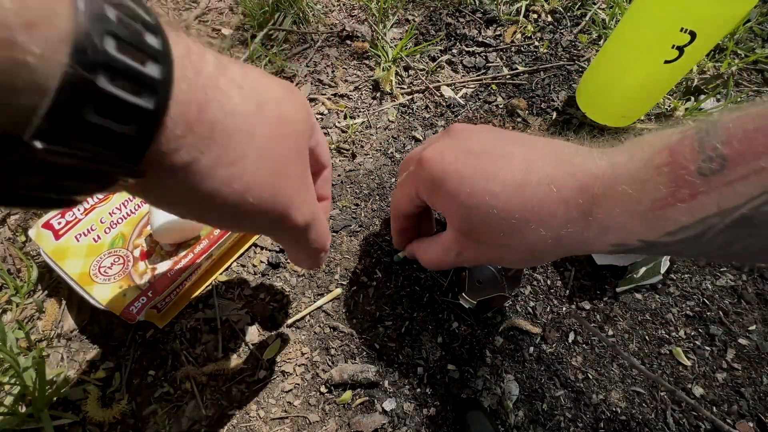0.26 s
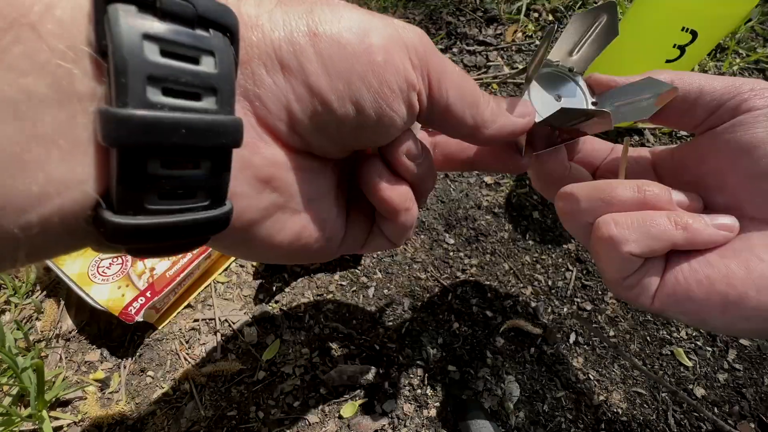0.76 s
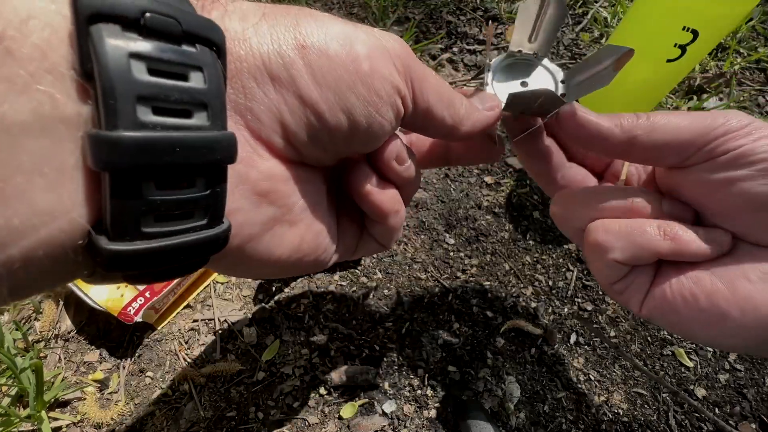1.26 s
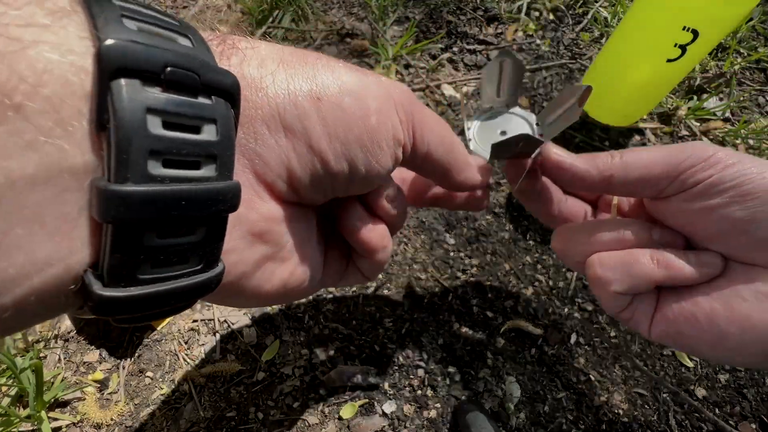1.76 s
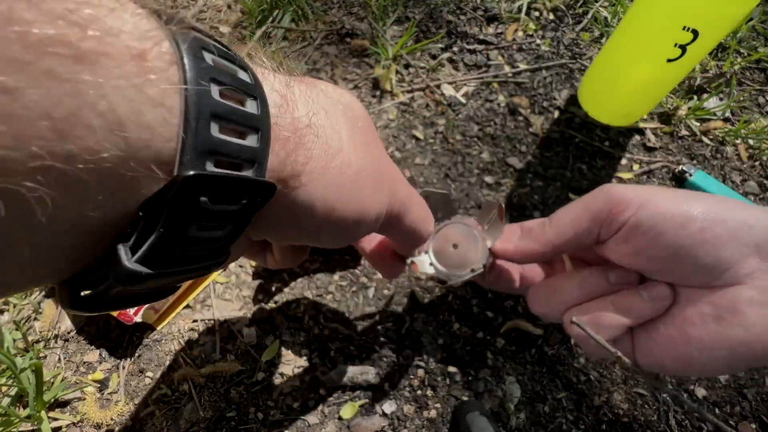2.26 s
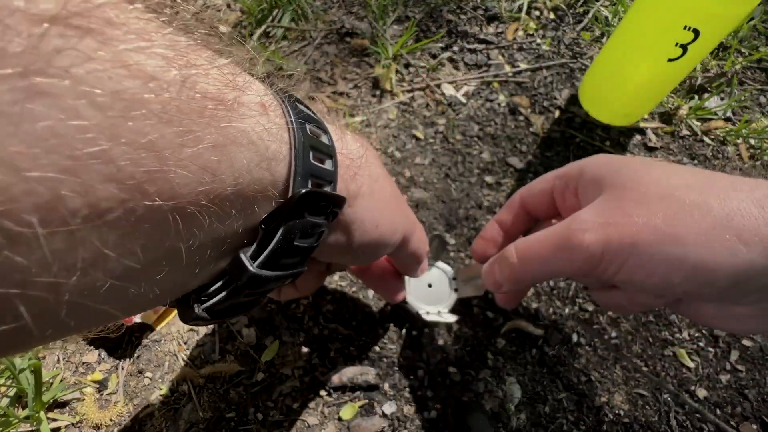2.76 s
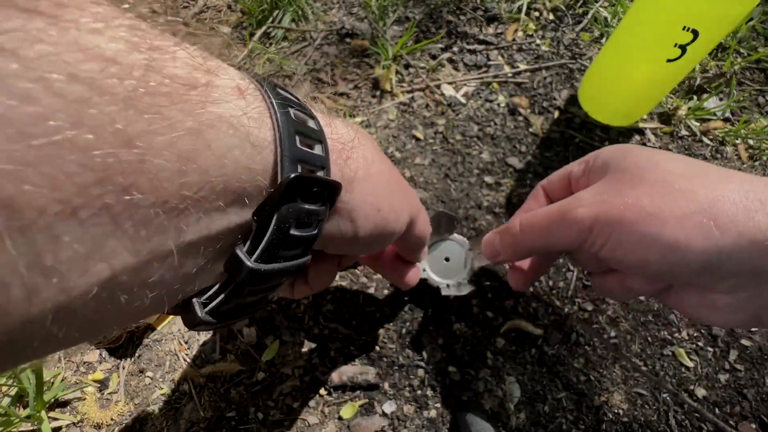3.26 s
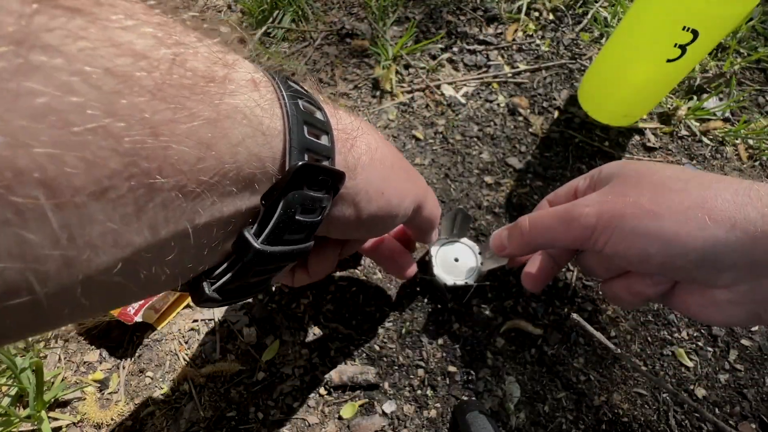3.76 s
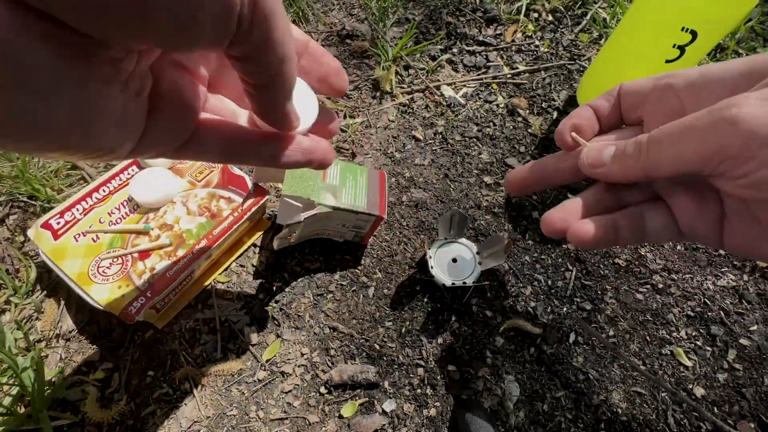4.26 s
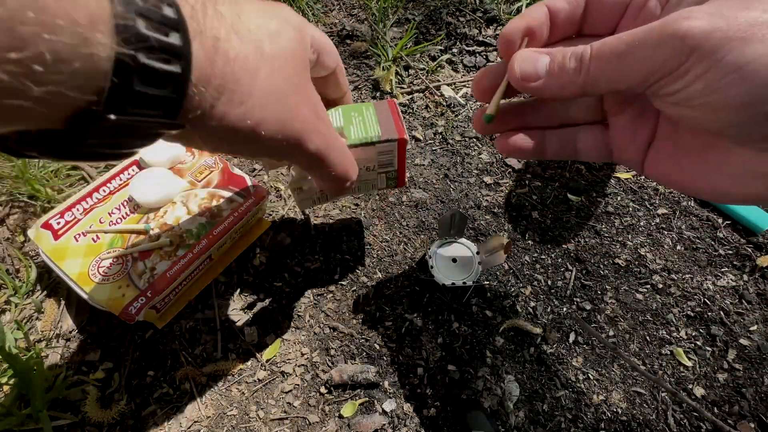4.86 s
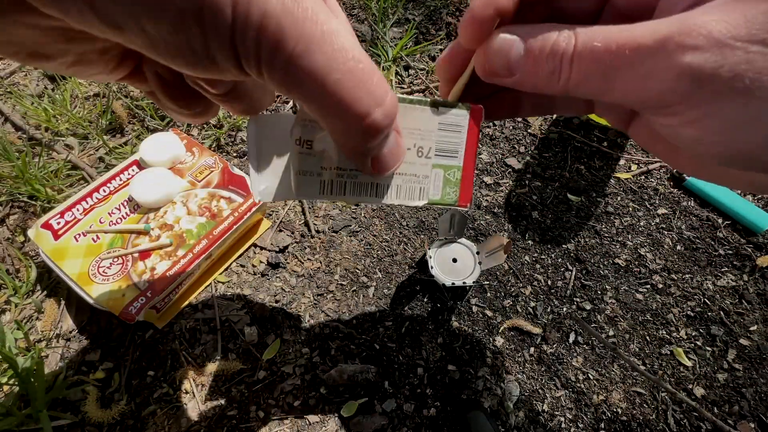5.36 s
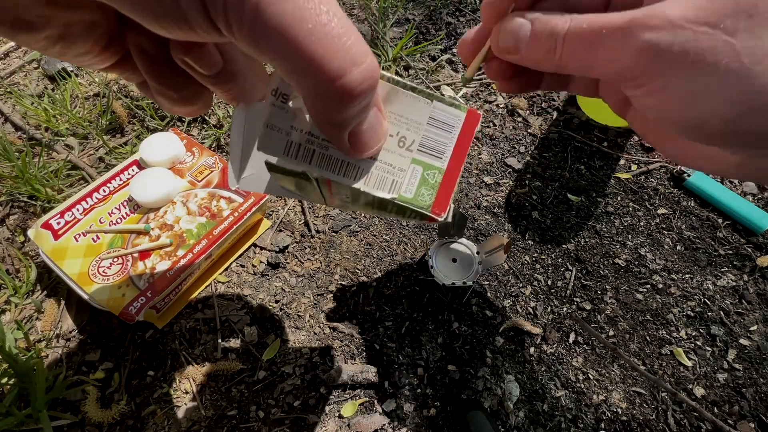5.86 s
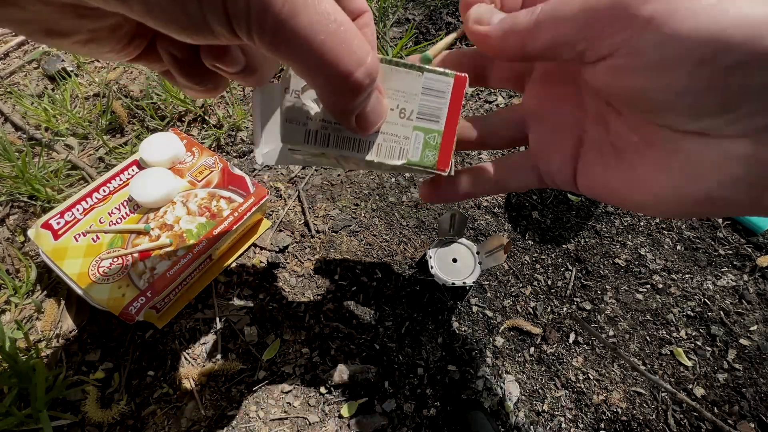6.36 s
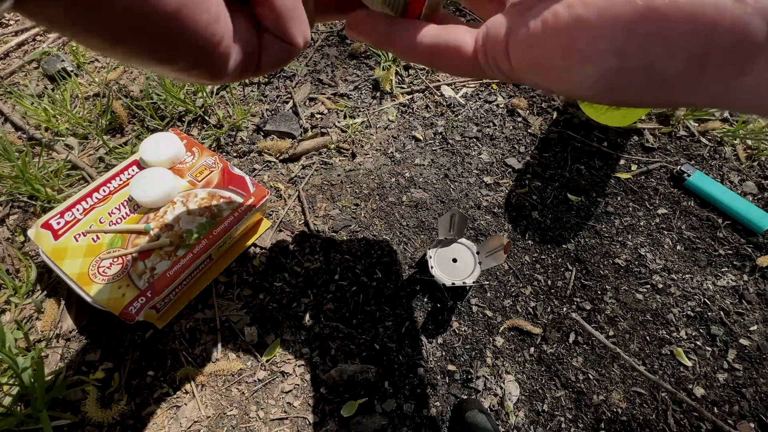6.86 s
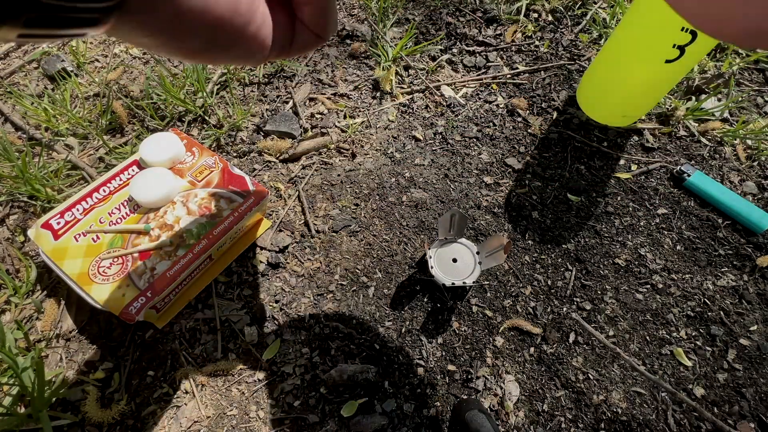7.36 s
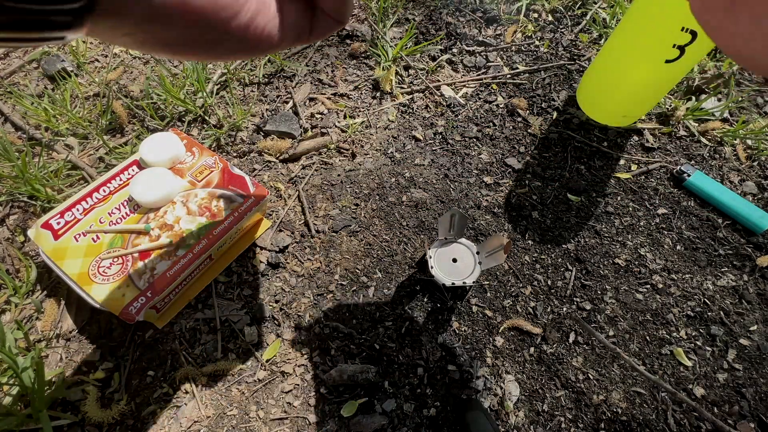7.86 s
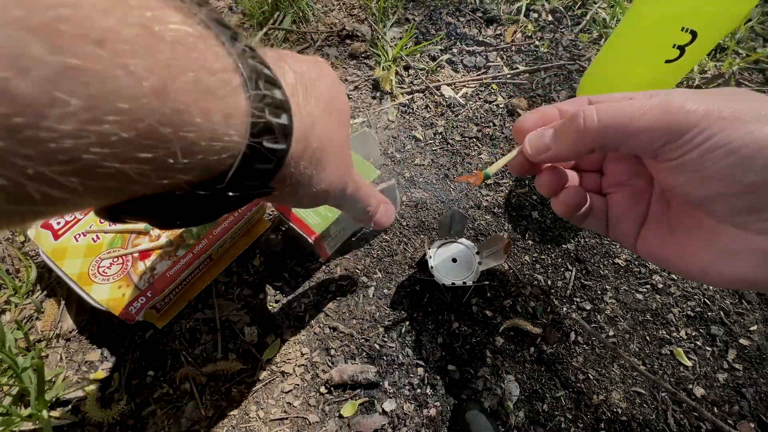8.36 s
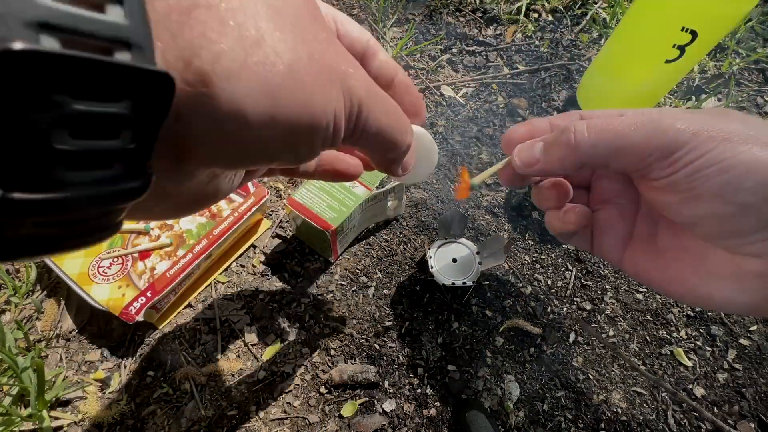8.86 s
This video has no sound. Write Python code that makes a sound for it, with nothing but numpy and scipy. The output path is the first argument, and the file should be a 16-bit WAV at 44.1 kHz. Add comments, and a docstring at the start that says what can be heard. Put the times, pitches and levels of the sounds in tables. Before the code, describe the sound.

Thin bright metal ticks and scratchy hinge slips come first, close to the microphone, with low wind buffets and a far bird whose whistles turn buzzy. A small hollow card box follows, with pops, taps and dry slides of fingers. One short match scrape fails, a second two seconds later ignites, and a hissing, sputtering flame brightens and swells to the end, with a few last box taps. Open air, dry, little echo.

```python
"""Outdoors, close to the microphone, a small folding metal stove clinks: ticks ring its legs and bowl. Stiff
hinges rasp in small slips, and a far bird sings in gliding tones that turn from whistle to buzz. A cardboard
box is then turned in the fingers: taps dent it and ring its modes, slides are streams of slips. A match is
struck on it twice, a tearing of hard grains; the second strike catches and the head flares as crackling noise
over a roar. Rumbling eddies of wind reach the microphone throughout, and buffets of air push on it: gusts, a
jerk of the hand at the first strike, low puffs as the flame sputters."""
import sys
import numpy as np
from scipy import signal
from scipy.fft import rfft, irfft
from scipy.io import wavfile

SR = 44100
rng = np.random.default_rng(int(sys.argv[2]) if len(sys.argv) > 2 else 0)


def materialize(psi):
    """Save the field psi as 16-bit PCM at rate SR to the path in sys.argv[1].

    A 1-D psi becomes a single channel; in a 2-D psi each row is a channel.
    """
    bounded = np.clip(np.atleast_2d(psi).T, -1, 1)
    quanta = np.round(bounded * 32767).astype(np.int16)
    wavfile.write(sys.argv[1], SR, quanta)


N = 401310

# All level_db columns are relative; the functions below set the final levels.

# stove clinks: start_s, peak_db, leg_ring_db, bowl_ring_db, strongest_bowl_hz
CLINKS = [(0.238, -9, -60, -59, 5680), (0.3, -40, -56, -54, 12200), (0.8943, -18, -75, -47.5, 7200),
          (1.029, -18, -64, -33.5, 7100), (1.043, -25, -69, -40.5, 7100), (1.09, -30, -71, -48.5, 9650),
          (1.193, -39, -65, -50, 13300), (1.222, -36, -55, -43.5, 14700), (1.498, -18, -64, -46, 14800),
          (1.776, -17, -44, -39, 14600), (1.8044, -30, -48.5, -42.5, 5710), (1.832, -16, -44, -38, 13800),
          (2.36, -19, -61, -42.5, 12400), (2.468, -4, -21.5, -31.5, 5600), (2.703, -17, -52, -42.5, 12200),
          (2.853, -30, -66, -50, 11700), (2.92, -18, -66, -43.5, 11700), (3.061, -20, -55, -47, 11200),
          (3.139, -28, -55, -35, 13700), (3.157, -29, -50.5, -40, 5530), (3.363, -29, -49, -44, 13300),
          (3.381, -14, -42.5, -28, 13300), (3.395, -21, -51, -34, 14500), (3.409, -4, -49.5, -23.5, 12200)]
# resonances of the stove's legs: pitch_hz, level_db, t60_s
LEG_MODES = [(2913, -1, .46), (2971, 0, .38), (3110, -5, .08), (3260, -4, .06)]
# resonances of the stove's bowl: pitch_hz, level_db, t60_s
BOWL_MODES = [(2400, -20, 0.91), (4640, -11.5, 0.23), (5100, -8.5, 0.098), (5600, 0, 0.092),
              (5690, -9.5, 0.18), (5800, -13, 0.1), (5940, -33, 0.15), (7100, -7.5, 0.26),
              (7130, -10, 0.26), (8100, -3, 0.066), (9000, -10, 0.079), (9000, -4, 0.12), (9650, 2, .07),
              (10540, 7.5, 0.14), (11200, 14.5, 0.049), (11700, 5, .07), (12200, 6.5, 0.14),
              (12420, 11.5, 0.073), (12500, 13, 0.052), (13300, 0, 0.087), (14100, 11, 0.061),
              (14000, -15, .04), (14100, 8, 0.12), (14900, 5, 0.084), (16200, 14, .06)]


def stove():
    """Each touch of thin metal is a scratchy tick that rings legs and bowl; the loose parts chatter after it."""
    s, peak_db, leg_db, bowl_db, main_hz = np.transpose(CLINKS)
    tick_colour = [(500, -39), (2500, -2.0), (5500, 17.5), (9000, 2), (13000, 7), (16000, 4.0)]   # (Hz, dB)
    tick = colour(bursts(s, peak_db - 20.0, t60=0.012, alike=0.059, rise_s=0.00085), tick_colour)

    # the legs ring on only when the stove is set down; otherwise fingers damp them
    free = leg_db == leg_db.max()
    legs = struck(s[free] + 0.0045, leg_db[free], LEG_MODES, vary_db=0, detune=0, skew=0.3)
    held_modes = [(hz, db, 0.52 * t60) for hz, db, t60 in LEG_MODES]
    legs += struck(s[~free], leg_db[~free] + 2.0, held_modes, vary_db=6.5, detune=0.0102, skew=0.54)

    emphasis_db = -7 * np.tanh(4 * octaves_from(main_hz, BOWL_MODES))
    bowl = struck(s, bowl_db + 14.5, BOWL_MODES, vary_db=2.5, detune=0.0055, skew=1.0,
                  emphasis_db=emphasis_db)

    settling = signal.lfilter([1], [1, -np.exp(-1 / (0.01 * SR))], blows(s, bowl_db))   # dies away in 10 ms
    chatter_modes = [(hz, 1.16 * db, 0.35 * t60) for hz, db, t60 in BOWL_MODES]
    chatter = ring(grains(per_s=2100, spread_db=16.5, alike=0.039) * settling, chatter_modes)
    return tick + legs + bowl + from_db(-9.0) * chatter


# hinges scraping, metal sliding in the fingers: start_s, length_s, grit_db, bowl_ring_db
HINGE_SCRAPES = [(.212, 0.029, -44, -53), (.255, 0.054, -57, -56), (.4, 0.022, -76, -50),
                 (.47, 0.023, -77, -49), (.62, 0.024, -72, -47), (.97, 0.073, -71, -48),
                 (1.03, 0.021, -60, -42), (1.225, 0.024, -60, -43), (1.265, 0.044, -59, -48),
                 (1.42, .05, -67, -52), (1.555, 0.018, -72, -58), (1.72, 0.09, -61, -46.5),
                 (1.772, 0.081, -58, -39), (2.27, 0.043, -72, -47), (2.428, 0.038, -49, -39),
                 (2.455, 0.013, -40.5, -38), (2.73, 0.051, -58, -49), (2.86, 0.034, -72, -51),
                 (3.11, .025, -68, -46), (3.14, 0.044, -52, -42), (3.28, 0.095, -55, -46.5),
                 (3.378, 0.0086, -42, -55), (3.62, 0.1, -55.5, -71)]
# spectrum of gritty friction, on hinges and on card: pitch_hz, level_db
GRIT_COLOUR = [(150, -15), (600, -7.5), (1500, 4.5), (2600, 4), (4200, -3), (6000, -3.5), (7600, -34),
               (9000, -6.5), (12500, 5), (16000, -1.5)]


def hinges():
    """Stiff hinges turn in a stream of small slips that rasp and ring the bowl."""
    grit, body = strokes(HINGE_SCRAPES, rise_s=0.017, release_s=0.018)
    slips = grains(per_s=1700, spread_db=1.5, alike=0.056) * from_db(2.0 * drift(77))
    damped_bowl = [(hz, db, 0.17 * t60) for hz, db, t60 in BOWL_MODES]
    return colour(slips * grit, GRIT_COLOUR) + ring(slips * body, damped_bowl)


FIDGET_FROM_S, FIDGET_TO_S = .05, 3.2
FIDGET_DB, FIDGET_RANGE_DB = -40, 10   # strongest tick, and how far below it the others may lie


def fidgets(count=16):
    """Fingers tick faintly on the metal at loose intervals and ring the bowl they damp."""
    spacing_s = (FIDGET_TO_S - FIDGET_FROM_S) / count
    s = FIDGET_FROM_S + spacing_s * (np.arange(count) + rng.random(count))
    levels_db = FIDGET_DB - FIDGET_RANGE_DB * rng.random(count)
    touches = bursts(s, levels_db, t60=0.053, alike=.3, rise_s=.002)
    return ring(touches, [(hz, db, 0.15 * t60) for hz, db, t60 in BOWL_MODES])


DENT_DB, AFTER_RING_DB = -4, -9.0   # the dent and the softer ring after it, against the tap's level
# resonances of the hollow box: pitch_hz, level_db, t60_s
BOX_MODES = [(482, 0, 0.023), (760, -2, 0.019), (990, 3.5, 0.033), (1110, 2.5, 0.031), (1300, 5.5, 0.016),
             (1490, 1, 0.031), (1806, -11.5, 0.073)]
# bright resonances of the card panels: pitch_hz, level_db, t60_s
PANEL_MODES = [(2210, 5, 0.02), (2680, 3.5, 0.045), (3600, -16, 0.025), (4270, 4.5, 0.029),
               (5050, 5, 0.019), (5680, 10.5, 0.02), (6600, 13, 0.0054), (6850, 12, 0.011),
               (8330, 10, 0.017), (9250, 5, 0.011)]


def box():
    """Taps set the hollow cardboard ringing; rubbing drives it with a stream of small slips."""
    s, peak_db, crack_db, main_hz = np.transpose(box_contacts())
    knock = dents(s, peak_db + DENT_DB, main_hz)
    knock += struck(s + 0.001963, peak_db + AFTER_RING_DB, BOX_MODES, vary_db=0.0, detune=0.023, skew=0.95,
                    emphasis_db=favoured(main_hz))
    crack = bursts(s, crack_db + 5.5, t60=0.0076, alike=0.74, rise_s=0.00043)
    rasp, hollow = rubs()
    bright = rasp + from_db(1.5) * colour(crack, GRIT_COLOUR) + from_db(-6.0) * ring(crack, PANEL_MODES)
    bright = ground_echo(bright, delay_ms=0.836, wander_ms=0.198, share=0.55)
    return snaps() + place(knock + hollow + landings() + bright, left_db=5.0, lag_ms=0.18)


# taps and snaps of the box: start_s, peak_db, crack_db, strongest_hz
TAPS = [(4.727, -15, -24, 1470), (4.735, -27, -38, 1450), (4.776, -25, -27, 920), (4.839, -41, -21.5, 880),
        (4.872, -24.5, -20.5, 1530), (5.2778, -14, -22, 1450), (5.298, -31, -31, 1300),
        (5.333, -25, -28, 1130), (5.344, -21.5, -26, 1430), (5.377, -18, -19, 1700),
        (5.391, -42, -28, 1400), (5.473, -15, -11, 1080), (5.484, -19.5, -18, 1230),
        (5.531, -24, -19, 1110), (5.705, -22, -40, 1260), (5.717, -6.5, -8, 1085), (5.736, -11, -37, 1110),
        (5.747, -11, -18, 1280), (5.798, -34.5, -30, 960), (5.859, -41, -35, 1220),
        (5.871, -21.5, -30, 1250), (6.2064, -14, -25.5, 1280), (6.233, -21, -25.5, 1120),
        (6.297, -40, -39.5, 1300), (6.38, -35, -23, 1180), (6.4556, -11, -22, 1500),
        (6.5702, -7.5, -19, 1260), (6.639, -22.5, -28.5, 1110), (6.7605, -6, -18.5, 1240),
        (6.792, -16, -32, 1490), (6.814, -29, -31, 990), (6.831, -33, -37, 1100), (6.846, -15.5, -40, 1560),
        (6.912, -33, -29.5, 1490), (6.938, -33, -58, 1110), (7.17, -21.5, -23.5, 1085),
        (7.293, -23.5, -22, 1108), (7.377, -28.5, -50, 1140), (7.4087, -22.5, -32, 1110),
        (7.476, -27, -28, 1040), (7.709, -3.5, -20, 1105), (8.146, -24, -16.5, 1490),
        (8.194, -17.5, -21, 1490), (8.384, -16, -19, 1310), (8.392, -21, -28, 910), (8.427, -22, -34, 1010)]
# fingers and match head sliding on the box: start_s, length_s, swell_s, grit_db, box_ring_db, strongest_hz
RUBS = [(4.67, 0.058, .004, -39.5, -38, 1490), (4.71, 0.027, 0.0041, -35.5, -33, 1300),
        (4.753, .025, 0.0044, -38, -39, 1300), (4.771, 0.064, 0.0016, -40.5, -44, 930),
        (4.836, 0.027, .001, -32.5, -39, 1490), (4.884, 0.052, .002, -47.5, -65, 1080),
        (5.028, 0.047, 0.0027, -51.5, -51, 1490), (5.079, 0.11, 0.0059, -54, -49.5, 1390),
        (5.321, 0.072, 0.0034, -47, -42.5, 1400), (5.463, .012, .004, -39, -40, 1220),
        (5.491, 0.047, 0.0014, -32, -35.5, 1110), (5.74, 0.025, .002, -40, -36.5, 1200),
        (5.792, 0.12, .003, -49.5, -47, 1190), (6.217, 0.018, 0.0062, -37, -36, 1058),
        (6.247, 0.019, .003, -52, -46.5, 1260), (6.363, 0.027, 0.0078, -40, -45, 1180),
        (6.391, 0.19, 0.034, -48, -46, 1300), (6.464, 0.027, .003, -56, -51, 1450),
        (6.531, 0.043, 0.013, -34, -33.5, 1060), (6.579, 0.1, .002, -66, -52.5, 1170),
        (6.748, 0.018, 0.0035, -30, -29, 1090), (6.788, 0.028, 0.0024, -33, -33, 1300),
        (6.824, 0.03, 0.0024, -45, -39.5, 1470), (6.871, 0.012, 0.0057, -39, -35.5, 1480),
        (6.893, 0.019, 0.0056, -62, -46, 1480), (6.95, 0.34, 0.05, -56.5, -52, 1080),
        (7.163, 0.053, 0.0017, -46, -39.5, 1066), (7.258, 0.09, 0.012, -46.5, -46.5, 1104),
        (7.406, 0.0081, .001, -35, -25.5, 1110), (7.42, 0.031, 0.0022, -41.5, -39, 1120),
        (7.466, 0.018, 0.0062, -30.5, -31, 1030), (8.339, 0.035, 0.009, -39, -32, 995),
        (8.401, 0.031, 0.0036, -44, -28, 1318)]
# knock and crack of a catch above the slide's own levels, and the spread of both
CATCH_KNOCK_DB, CATCH_CRACK_DB, CATCH_SPREAD_DB = -5.5, 2, -1


def box_contacts():
    """The firm taps, and a light catch of the card at a random moment of every slide."""
    rows = list(TAPS)
    for s, length, _, grit_db, box_db, _ in RUBS:
        vary_db = CATCH_SPREAD_DB * rng.standard_normal()
        caught_s = s + length * rng.random()
        knock_db, crack_db = box_db + CATCH_KNOCK_DB + vary_db, grit_db + CATCH_CRACK_DB + vary_db
        rows.append((caught_s, knock_db, crack_db, rng.uniform(870, 1300)))
    return rows


def rubs():
    """Each slide feeds small slips and sparse crackles into a box held a little differently: rasp, hollow ring."""
    slips = grains(per_s=4000, spread_db=2.5, alike=0.35) * from_db(2.0 * drift(71))
    slips = rms_one(slips + from_db(-7) * grains(per_s=170, spread_db=3.0, alike=0.8))
    rasp, hollow = np.zeros((2, 2, N))
    for s, length, swell_s, grit_db, box_db, main_hz in RUBS:
        t = np.arange(round((length + .05) * SR)) / SR
        pressure = (1 - np.exp(-t / swell_s)) * np.exp(-np.maximum(t - length, 0) / 0.0069)
        force = slips[:, round(s * SR):][:, :len(t)] * pressure
        body = gripped(BOX_MODES, vary_db=3.0)
        body[np.argmin(np.abs(body[:, 0] - main_hz)), 0] = main_hz   # the nearest mode takes the listed pitch
        body[:, 1] += favoured(np.array([main_hz])).ravel()
        add(hollow, s, from_db(box_db) * ring(force, body))
        add(rasp, s, from_db(grit_db + 1.0) * colour(force, GRIT_COLOUR))
        add(rasp, s, from_db(grit_db - 6.0) * ring(force, gripped(PANEL_MODES, vary_db=5.5)))
    return rasp, hollow


GRIP_SHIFT = 0.047   # spread of the retuning, as a share of the pitch


def gripped(modes, vary_db):
    """The modes of the card as one grip of the fingers retunes them and changes their strengths."""
    hz, db, t60 = np.transpose(modes)
    shift, strength = rng.standard_normal((2, len(hz)))
    return np.transpose([hz * (1 + GRIP_SHIFT * shift), db + vary_db * strength, t60])


FAVOUR_DB = 10.5   # the most that a far mode is held down


def favoured(main_hz):
    """Where the box is touched decides which of its modes speaks: dB for each contact and mode."""
    return -FAVOUR_DB * np.tanh(3.8 * octaves_from(main_hz, BOX_MODES))


DENT_CYCLES = 1.06   # swings until the dent is strongest


def dents(times, peaks_db, pitches_hz):
    """The touched face of the card gives way and swings back: a hollow pop of a few cycles."""
    out, t = np.zeros((2, N)), np.arange(SR // 50) / SR
    for s, db, hz in zip(times, peaks_db, pitches_hz):
        u = t * hz / DENT_CYCLES
        add(out, s, from_db(db) * u * np.exp(1 - u) * np.sin(2 * np.pi * hz * t))
    return out


# the box bumps the ground: start_s, peak_db
LANDINGS = [(4.873, -33), (8.385, -51)]
# resonances of the box on the ground: pitch_hz, level_db, t60_s
BUMP_MODES = [(418, -9, .08), (477, 13, 0.17), (580, -11, 0.059)]


def landings():
    """The box bumps the ground and a few low modes thud."""
    s, peak_db = np.transpose(LANDINGS)
    return struck(s, peak_db, BUMP_MODES, vary_db=1.0, detune=.01, skew=.2)


# thin, very bright snaps of the card's edge: start_s, peak_db
SNAPS = [(6.348, -14), (7.123, -14), (7.632, -33), (8.144, 0)]
# spectrum of a snap: pitch_hz, level_db
SNAP_COLOUR = [(2000, -36), (7000, -16), (9500, 7.5), (12500, 18), (16000, -6)]


def snaps():
    """The card's thin edge snaps: short bursts of very bright noise."""
    s, peak_db = np.transpose(SNAPS)
    return colour(bursts(s, peak_db - 2.0, t60=0.015, alike=0.43, rise_s=0.0018), SNAP_COLOUR)


# fast strikes along the strip: start_s, length_s, grit_db, box_ring_db
STRIKES = [(5.7157, 0.022, -22.5, -25), (7.711, 0.0064, -10.5, -22), (7.7197, 0.0051, -28, -19.5)]
# spectrum of the tearing grains: pitch_hz, level_db
STRIKE_COLOUR = [(30, -10), (90, 2), (200, -6), (600, 3.5), (1500, 7), (3000, 8), (4200, 0.5), (5800, 9.5),
                 (7600, 0), (9000, 5), (11000, 7), (14000, 17), (16000, -16)]
# the whole box bending: pitch_hz, level_db, t60_s
FLEX_MODES = [(146.5, -3, 0.1), (199, 7.5, 0.054), (320, -8, 0.089), (453, -43, 0.037)]
# the head squeaks as it is pressed on, and the stick twangs when it slips: slip_s, pitch_hz, level_db
SQUEAKS = [(5.473, 5530, -26.5), (5.7172, 5680, -17), (7.711, 5210, -17.5), (7.71, 6130, -27)]
SQUEAK_SWELL_S, TWANG_DB, TWANG_S = 0.0059, 18, 0.0024   # time constants; the twang is set against the squeak


def strikes():
    """The match head squeaks, then tears along the strip: dense hard grains also shake and bend the box."""
    grit, body = strokes(STRIKES, rise_s=0.00018, release_s=0.0016)
    tearing = grains(per_s=18000, spread_db=4.0, alike=0.32)
    sound = from_db(6.5) * colour(tearing * grit, STRIKE_COLOUR)
    sound += from_db(-10.5) * ring(tearing * grit, PANEL_MODES)
    sound += from_db(-2.5) * ring(tearing * body, BOX_MODES)
    s, length, _, box_db = np.transpose(STRIKES)
    sound += struck(s + length / 2, box_db - 3.0, FLEX_MODES, vary_db=3.0, detune=0.07, skew=0.38)

    t = np.arange(-SR // 40, SR // 100) / SR   # the slip is at zero
    twang = from_db(TWANG_DB) * np.exp(-np.abs(t) / TWANG_S)
    slip = np.where(t < 0, np.exp(t / SQUEAK_SWELL_S), twang)
    for s, hz, db in SQUEAKS:
        unsteady = np.cumsum(0.17 * rng.standard_normal(len(t)))
        add(sound, s + t[0], from_db(db) * slip * np.sin(2 * np.pi * hz * t + unsteady))
    return place(sound, left_db=7.0, lag_ms=0.1)


IGNITION_S, IGNITION_RISE_S = 7.812, 0.02
# level, how far below it the flare starts, time constant of the growth
FIZZ_DB, FIZZ_GROWTH_DB, FIZZ_GROWTH_S = -31.5, 2.5, 0.28
ROAR_DB, ROAR_GROWTH_DB, ROAR_GROWTH_S = -35, 17, 0.39
DULL_START_DB, BRIGHTENING_S, BRIGHT_FROM_HZ = 12.5, 0.2, 1500   # the treble starts this far down
CRACKLES_PER_S, CRACKLE_DB = 300, -7
SPURT_DB, SPURT_S = -46, 0.45   # the first spurt of gas and its decay
# spectrum of the fizz: pitch_hz, level_db
FIZZ_COLOUR = [(300, -22), (700, 4), (1050, 3), (1500, 5), (2200, 0.5), (2800, -4), (3600, -2.5),
               (4500, -5), (6200, -4.5), (7600, -11.5), (8200, -3.5), (9800, -5.5), (11400, 5), (14000, 5),
               (15500, -2.5)]
# spectrum of the roar: pitch_hz, level_db
ROAR_COLOUR = [(40, -17), (100, -0.5), (180, 1.5), (340, -2.5), (550, -5), (900, -53), (2000, -21.5)]
# spectrum of the hollow first spurt: pitch_hz, level_db
SPURT_COLOUR = [(400, -33), (800, 4), (1080, 10), (1500, -11), (2300, -2), (3500, -22)]


def flare():
    """The head catches with a hollow spurt, then burns as a sputtering, crackling jet over a fluttering roar."""
    age = np.maximum(np.arange(N) / SR - IGNITION_S, 0)
    lit = 1 - np.exp(-age / IGNITION_RISE_S)
    crackle = from_db(CRACKLE_DB) * grains(per_s=CRACKLES_PER_S, spread_db=2.0, alike=0.54)
    jet = grains(per_s=14000, spread_db=-0.2, alike=0.075)
    sputter = patchy(jet + crackle, depth_db=2.4, rate=16)

    fizz_db = FIZZ_DB - FIZZ_GROWTH_DB * np.exp(-age / FIZZ_GROWTH_S) + 1.1 * drift(45)
    fizz = colour(sputter, FIZZ_COLOUR) * from_db(fizz_db)
    dull = signal.lfilter(*signal.butter(1, BRIGHT_FROM_HZ, fs=SR), fizz)
    fizz = dull + (fizz - dull) * from_db(-DULL_START_DB * np.exp(-age / BRIGHTENING_S))
    fizz = ground_echo(fizz, delay_ms=0.669, wander_ms=0.22, share=0.35)

    roar_db = ROAR_DB - ROAR_GROWTH_DB * np.exp(-age / ROAR_GROWTH_S) + 1.2 * drift(27)
    roar = colour(noise(alike=0.73), ROAR_COLOUR) * from_db(roar_db)
    spurt = colour(sputter, SPURT_COLOUR) * from_db(SPURT_DB) * np.exp(-age / SPURT_S)
    return place(lit * (fizz + roar + spurt), left_db=-0.3, lag_ms=0.091)


# slurred bird notes: start_s, length_s, start_hz, middle_hz, end_hz, level_db
SONG = [(1.425, 0.081, 6200, 5950, 5400, -61), (1.63, .06, 5750, 5580, 5200, -60),
        (1.968, 0.071, 3740, 4560, 5040, -51.5), (2.1, 0.05, 5100, 4580, 4500, -48),
        (2.145, 0.068, 4470, 4250, 3760, -49), (2.28, 0.047, 3780, 4050, 4350, -55),
        (2.315, 0.058, 3870, 3530, 3100, -59), (2.655, 0.084, 3420, 3870, 3930, -57.5),
        (2.8, 0.077, 3100, 3600, 3600, -57.5), (2.942, 0.12, 3600, 3310, 2780, -56),
        (3.165, 0.1, 3430, 3080, 2700, -54.5), (4.44, 0.22, 3820, 3480, 3300, -49.5),
        (4.91, 0.042, 3520, 3300, 3380, -49.5), (5.04, 0.096, 4020, 3600, 3410, -48.5),
        (5.125, 0.06, 4400, 4820, 4940, -49), (5.21, 0.077, 3700, 3410, 3100, -49.5),
        (5.335, 0.024, 4520, 4840, 5340, -44), (5.41, 0.048, 3600, 3460, 3370, -51),
        (5.56, 0.12, 4750, 4940, 5070, -59.5), (5.993, 0.062, 4170, 3850, 3600, -58.5)]
# the voice turns from a clear whistle into a buzz; the buzz waver adds to the whistle's
BUZZ_FROM_S, BUZZ_ONSET_S, WHISTLE_WAVER_HZ, BUZZ_WAVER_HZ = 4.15, 0.4, 60, 540
FRAY_S, FLUTTER_DB = .022, 3.5   # time for a note to fray into buzz; tremble in level


def bird():
    """Far slurred whistles that turn into buzzy notes, smeared by the trees."""
    out, waver = np.zeros(N), drift(330)
    for s, length, start_hz, middle_hz, end_hz, db in list(SONG) + rising_run():
        u = np.linspace(0, 1, round(length * SR))
        buzz = .5 + .5 * np.tanh((s - BUZZ_FROM_S) / BUZZ_ONSET_S)
        slur = np.polyval(np.polyfit([0, .5, 1], [start_hz, middle_hz, end_hz], 2), u)
        frayed = 1 - np.exp(-u * length / FRAY_S)   # no buzz at the very start of a note
        waver_hz = WHISTLE_WAVER_HZ + BUZZ_WAVER_HZ * buzz * frayed
        hz = slur + waver_hz * waver[round(s * SR):][:len(u)]
        swell = np.sqrt(np.abs(np.sin(np.pi * u)))
        add(out, s, from_db(db) * swell * np.sin(2 * np.pi * np.cumsum(hz) / SR))
    out = out * from_db(FLUTTER_DB * drift(26))

    trees = rng.standard_normal((2, SR // 2)) * from_db(-60 * np.arange(SR // 2) / SR / .25)
    echo = signal.oaconvolve(out[None], trees / np.linalg.norm(trees[0]), axes=1)[:, :N]
    # the buzzy notes blur most
    scattered = .58 + .16 * (1 + np.tanh((np.arange(N) / SR - BUZZ_FROM_S) / BUZZ_ONSET_S))
    heard = np.sqrt(1 - scattered ** 2) * out + scattered * echo
    return place(from_db(0.5) * heard, left_db=6.0, lag_ms=0.064)


# in mid song comes a run of upward notes that slows, lengthens, climbs and swells (steps are per note)
RUN_START_S, RUN_GAP_S, RUN_SLOWING_S = 3.51, 0.1, 0.0148
RUN_UPSTROKE_S, RUN_NOTE_S, RUN_LENGTHENING_S = .026, 0.038, 0.0089
RUN_HZ, RUN_CLIMB_HZ, RUN_SLUR_HZ = 3680, 25, 850
RUN_DB, RUN_SWELL_DB = -60, 1.25


def rising_run(count=7):
    """The notes of the run, each a step on from the last: a quick upstroke, then an arched top."""
    k = np.arange(count)
    s = RUN_START_S + RUN_GAP_S * k + RUN_SLOWING_S * k * (k - 1) / 2
    hz = RUN_HZ + RUN_CLIMB_HZ * k
    db = RUN_DB + RUN_SWELL_DB * k
    middle, shoulder, top = hz + RUN_SLUR_HZ / 2, hz + .75 * RUN_SLUR_HZ, hz + RUN_SLUR_HZ
    upstrokes = zip(s, [RUN_UPSTROKE_S] * count, hz, middle, shoulder, db)
    lengths = RUN_NOTE_S + RUN_LENGTHENING_S * k
    arches = zip(s + RUN_UPSTROKE_S / 2, lengths, shoulder, top, shoulder, db)
    return [*upstrokes, *arches]


# arms and fingers moving: time_s, brush_db, skin_hiss_db
HANDS = [(0.0, -63, -61), (0.58, -64.5, -67.5), (0.69, -55, -82), (0.82, -63, -64), (0.95, -58.5, -64),
         (1.11, -62, -62), (1.5, -60.5, -69), (2.32, -54.5, -64.5), (2.58, -52, -78), (2.82, -60, -66),
         (3.26, -58, -65.5), (3.56, -63, -69), (4.32, -59, -54.5), (4.69, -47, -55), (5.1, -60, -63),
         (5.26, -55, -62.5), (6.17, -71, -68), (6.33, -61.5, -66), (6.38, -54, -48.5), (6.58, -53.5, -52.5),
         (6.7, -56.5, -59), (6.8, -45.5, -46), (6.96, -61.5, -61.5), (7.06, -55, -55.5), (7.32, -47, -49),
         (7.47, -73, -64), (7.71, -49, -66), (7.8, -57, -48)]
# spectrum of the soft brush: pitch_hz, level_db
BRUSH_COLOUR = [(200, 4.5), (500, -2), (1200, 1), (2200, -3), (4000, -20), (9000, -14.5), (16000, -38)]
# spectrum of the silky skin hiss: pitch_hz, level_db
SKIN_COLOUR = [(1500, -12.5), (4000, -8.5), (6500, -7), (9000, -6), (12500, 4.5), (16000, -1.5)]
BRUSH_DB, SKIN_DB = 0.5, 4.5   # added to the curves


def hands():
    """The soft brush of moving arms and skin sliding on skin: streams of fine grains."""
    brush_db, skin_db = in_time(HANDS)
    brush = colour(grains(per_s=9000, spread_db=1.5, alike=0.22), BRUSH_COLOUR)
    brush = brush * from_db(brush_db + BRUSH_DB + 2.74 * drift(11.0))
    skin = colour(grains(per_s=7600, spread_db=-1.0, alike=0.067), SKIN_COLOUR)
    skin = skin * from_db(skin_db + SKIN_DB + 4.4 * drift(11.2))
    skin = ground_echo(skin, delay_ms=0.6, wander_ms=0.115, share=0.92)
    return place(brush + skin, left_db=5.5, lag_ms=0.18)


# strength of the breeze at the microphone: time_s, level_db
BREEZE = [(0.0, -55), (0.71, -51), (1.24, -46.5), (1.72, -50.5), (2.18, -38), (2.36, -36.5), (2.56, -47),
          (2.94, -71), (3.47, -58), (4.18, -41), (4.28, -33.5), (4.54, -56), (4.79, -68), (4.96, -51),
          (5.7, -76), (6.61, -53), (6.95, -61), (7.8, -56), (8.0, -61), (8.15, -64), (8.54, -42.5),
          (9.1, -53)]
# sudden buffets of air: gusts of wind, the hand's jerk at 5.73 s, the flame's sputter puffs after 7.9 s:
# start_s, wake_length_s, peak_db, rough_edge_db
BUFFETS = [(1.349, 0.062, -39, -75), (1.939, 0.029, -30, -71), (2.026, 0.013, -30, -52),
           (2.181, 0.089, -33, -70), (2.228, 0.025, -13, -42), (2.252, 0.0087, -26, -39),
           (2.342, 0.055, -35, -74), (2.481, 0.029, -24, -55), (3.62, 0.05, -36, -59),
           (3.953, 0.062, -23.5, -34.5), (4.17, 0.011, -32, -38.5), (4.28, 0.11, -39, -51),
           (4.9, 0.14, -34.5, -50.5), (5.732, 0.014, -28, -37.5), (6.386, 0.017, -33, -57),
           (6.93, 0.021, -44, -71), (7.934, .025, -42, -51), (8.191, 0.015, -39, -54),
           (8.55, 0.018, -33, -56), (8.822, 0.02, -19, -57), (8.919, 0.044, -31, -37)]
# spectrum of the eddies: pitch_hz, level_db
WIND_COLOUR = [(20, -40), (45, 1), (78, 7), (120, -6), (200, -12), (330, -27), (600, -37), (1500, -82.5)]
BREEZE_DB, GUSTINESS_DB, WAKE_DB, PUSH_DB = 2.5, 3.5, -10, 25.5


def wind():
    """Eddies rumble at each port on their own; a buffet is a push of air with a rough edge and a wake of
    eddies."""
    breeze_db, = in_time(BREEZE)
    wake, _ = strokes(BUFFETS, rise_s=0.0028, release_s=0.011)
    flow = from_db(breeze_db + BREEZE_DB + GUSTINESS_DB * drift(16)) + from_db(WAKE_DB) * wake
    eddies = colour(noise(alike=0), WIND_COLOUR) * flow

    s, _, peak_db, edge_db = np.transpose(BUFFETS)
    push_modes = [(69.4, 2.0, 0.042), (132.5, 0.0, 0.093), (237, -25.0, 0.013)]   # (Hz, dB, t60 s)
    push = ring(blows(s, peak_db + PUSH_DB), push_modes)
    edge_colour = [(60, -39), (200, 8.0), (430, 1.0), (750, -47), (3000, -59)]   # (Hz, dB)
    edge = colour(bursts(s, edge_db + 14.5, t60=0.05, alike=0.74, rise_s=0.00079), edge_colour)

    high_pass = signal.butter(2, 36, "high", fs=SR, output="sos")
    # a swirl pushes one port and pulls the other
    rumble = signal.sosfilt(high_pass, eddies + push * [[1], [-0.6]] + edge)
    return place(rumble - 0.0074 * rumble[::-1], left_db=3.0, lag_ms=0)


# spectrum of the steady background hiss: pitch_hz, level_db
AIR_COLOUR = [(40, 1), (150, 7), (350, -0.5), (700, -20), (1050, -14), (1300, -51), (1650, -9), (1950, 4.5),
              (2250, -16), (3400, -37), (6200, -38), (7400, -7.5), (9000, -26), (16000, -17.5)]


def air():
    """A steady hiss: coloured noise, mostly separate left and right."""
    return from_db(-56.0) * colour(noise(alike=0.23), AIR_COLOUR)


def surroundings(x):
    """A faint, short scatter from the ground and the arms: decaying noise as the echo pattern."""
    t = np.arange(SR // 4) / SR
    scatter = rng.standard_normal((2, len(t))) * from_db(-60 * t / 0.2) * (t > .002)
    return x + from_db(-27.0) * signal.oaconvolve(x, scatter / np.linalg.norm(scatter[0]), axes=1)[:, :N]


def ground_echo(x, delay_ms, wander_ms, share):
    """A reflection whose path drifts slowly; each port has its own path."""
    n, out = np.arange(N), []
    for side in x:
        delay = (delay_ms + wander_ms * drift(.5)) * SR / 1000
        out.append(np.interp(n - delay, n, side))
    return x + share * np.stack(out)


def place(x, left_db, lag_ms):
    """A source to the left is louder there and reaches the right side later."""
    n = np.arange(N)
    right = np.interp(n - lag_ms * SR / 1000, n, x[1])
    return np.stack([x[0] * from_db(left_db / 2), right * from_db(-left_db / 2)])


def struck(times, peaks_db, modes, vary_db, detune, skew, emphasis_db=None):
    """Every contact rings all modes in a mix of its own; the two ports hear them a little out of step."""
    out, t = np.zeros((2, N)), np.arange(SR // 2) / SR
    hz, db, t60 = np.transpose(modes)[:, :, None]
    t = t[t < t60.max()]
    signs = (-1) ** np.arange(len(modes))[:, None]
    fade = from_db(db - 60 * t / t60) * (1 - np.exp(-t / .0004)) * signs
    for k, (s, peak_db) in enumerate(zip(times, peaks_db)):
        strength, stretch, late = rng.standard_normal((3, len(modes), 1))
        favour_db = 0 if emphasis_db is None else emphasis_db[k]
        gain = from_db(vary_db * strength + favour_db) * fade
        phase = 2 * np.pi * hz * (1 + detune * stretch) * t
        tone = np.stack([(gain * np.sin(phase + side * skew * late)).sum(0) for side in (1, -1)])
        add(out, s, from_db(peak_db) * tone / np.abs(tone).max(1, keepdims=True))
    return out


def octaves_from(main_hz, modes):
    """How far each mode lies from the one that a contact favours."""
    return np.abs(np.log2(np.array(modes)[:, :1] / main_hz[:, None, None]))


def ring(force, modes):
    """Decaying sines in parallel, signs alternating; white noise keeps its power."""
    t = np.arange(round(SR * np.array(modes)[:, 2].max())) / SR
    response = np.zeros(len(t))
    for k, (hz, db, t60) in enumerate(modes):
        response += (-1) ** k * from_db(db - 60 * t / t60) * np.sin(2 * np.pi * hz * t)
    return signal.oaconvolve(force, response[None] / np.linalg.norm(response), axes=1)[:, :N]


def colour(x, spectrum, size=2048):
    """Causal filter with the given spectrum, by way of the cepstrum; white noise keeps its power."""
    hz, db = np.transpose(spectrum)
    grid = np.maximum(np.arange(size // 2 + 1) * SR / size, 1)
    cepstrum = irfft(np.log(from_db(np.interp(np.log(grid), np.log(hz), db))))
    response = irfft(np.exp(rfft(2 * cepstrum[:size // 2], size)))
    return signal.oaconvolve(x, response[None] / np.linalg.norm(response), axes=1)[:, :N]


def patchy(x, depth_db, rate, count=12):
    """Each band swells and sinks on its own, so the colour keeps shifting."""
    out = 0
    for hz in np.geomspace(800, 14000, count):
        band = signal.lfilter(*signal.iirpeak(hz, 5, fs=SR), x)
        out = out + band * (from_db(depth_db * drift(rate)) - 1)
    return x + out


def bursts(times, levels_db, t60, alike, rise_s):
    """Contacts as quickly dying crunches, each near its own rms level."""
    out, t = np.zeros((2, N)), np.arange(SR // 8) / SR
    fade = from_db(-60 * t / t60) * (1 - np.exp(-t / rise_s))
    for s, db in zip(times, levels_db):
        crunch = pair(rng.standard_normal((3, len(t))), alike) * fade
        add(out, s, from_db(db) * crunch * np.linalg.norm(fade) / np.linalg.norm(crunch))
    return out


def blows(times, levels_db):
    """One clean impulse for each contact."""
    out = np.zeros((2, N))
    out[:, np.round(np.asarray(times) * SR).astype(int)] = from_db(levels_db)
    return out


def strokes(rows, rise_s, release_s):
    """Two envelopes, one for each level column: they bite, hold and let go."""
    out, t = np.zeros((2, N)), np.arange(SR // 2) / SR
    for s, length, first_db, second_db in rows:
        shape = (1 - np.exp(-t / rise_s)) * np.exp(-np.maximum(t - length, 0) / release_s)
        add(out, s, from_db([[first_db], [second_db]]) * shape)
    return out


def grains(per_s, spread_db, alike):
    """Tiny impulses of uneven size at random moments, at unit rms."""
    born = rng.random(N) < per_s / SR
    sizes = from_db(spread_db * np.minimum(rng.exponential(1, N), 4))
    return rms_one(noise(alike) * born * sizes)


def noise(alike):
    """White stereo noise."""
    return pair(rng.standard_normal((3, N)), alike)


def pair(three, alike):
    """Left and right, each made of a shared signal and one of its own."""
    alike = np.clip(alike, 0, 1)
    return np.sqrt(alike) * three[0] + np.sqrt(1 - alike) * three[1:]


def drift(rate):
    """Smooth chance with about `rate` turns a second; spread 1."""
    r = np.exp(-80 * np.pi * rate / SR)   # worked out at every 40th sample
    slow = signal.lfilter([1], [1, -2 * r, r * r], rng.standard_normal(N // 40 + 2002))[2000:]
    return np.interp(np.arange(N) / 40, np.arange(len(slow)), rms_one(slow))


def in_time(rows):
    """Each column of a curve, sample by sample."""
    s, *columns = np.transpose(rows)
    return [np.interp(np.arange(N) / SR, s, c) for c in columns]


def add(track, s, sound):
    """Mix a sound into a track from time s."""
    start = round(s * SR)
    track[..., start:start + sound.shape[-1]] += sound[..., :N - start]


def rms_one(x):
    """Scale to unit rms."""
    return x / np.sqrt(np.mean(x ** 2) + 1e-20)


def from_db(db):
    """Decibels to gain."""
    return 10 ** (np.asarray(db) / 20)


def scene():
    """Hand work close by, the bird far off, wind on the ports."""
    handled = stove() + hinges() + fidgets() + box() + strikes()
    return surroundings(handled) + flare() + bird() + hands() + air() + wind()


CUTOFF_HZ = 16000


def record(dry):
    """The ports cut two notches and favour the left near 4 kHz; the top is nearly mono, peaks are rounded."""
    x = dry - 0.92 * signal.lfilter(*signal.iirpeak(5340, 18, fs=SR), dry)
    x = x - 0.72 * signal.lfilter(*signal.iirpeak(10750, 6, fs=SR), x)
    x = x + 0.16 * signal.lfilter(*signal.iirpeak(4200, 1.8, fs=SR), x) * [[1], [-1]]
    # each crossover filter runs twice
    low = np.tile(signal.butter(4, 10000, "low", fs=SR, output="sos"), (2, 1))
    high = np.tile(signal.butter(4, 10000, "high", fs=SR, output="sos"), (2, 1))
    x = signal.sosfilt(low, x) + signal.sosfilt(high, 0.19 * x.mean(0) + 0.12 * x)
    rounded = .8 * np.tanh(x / .8)
    return signal.sosfilt(signal.ellip(10, .2, 80, CUTOFF_HZ, fs=SR, output="sos"), rounded)


dry = scene()
out = record(dry)
materialize(out)
```